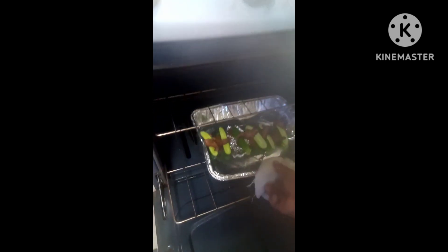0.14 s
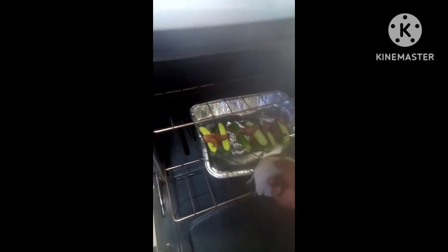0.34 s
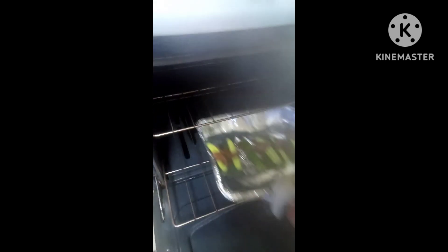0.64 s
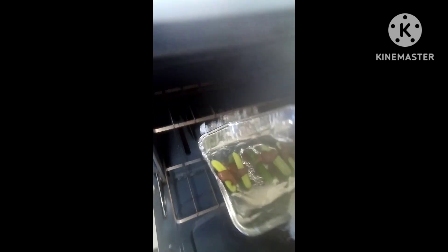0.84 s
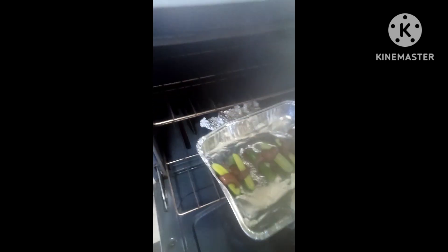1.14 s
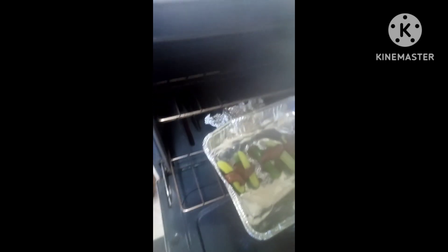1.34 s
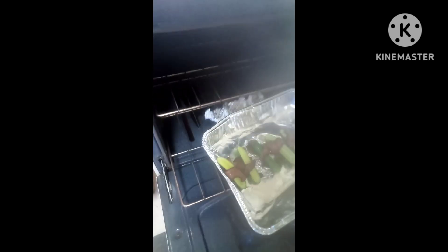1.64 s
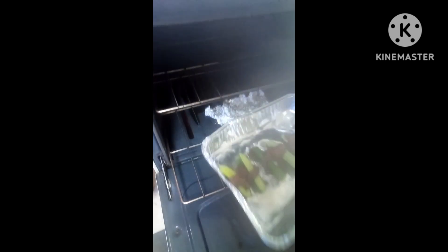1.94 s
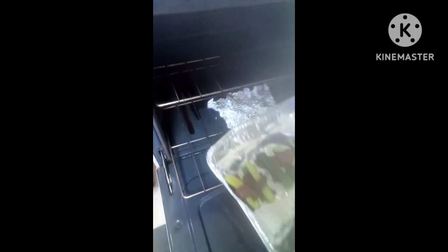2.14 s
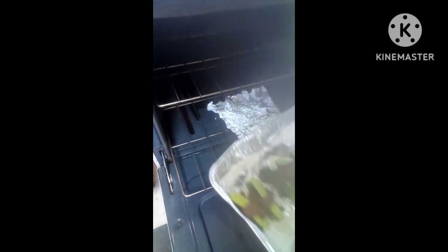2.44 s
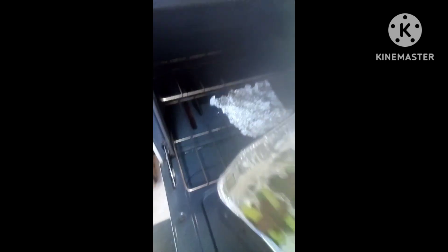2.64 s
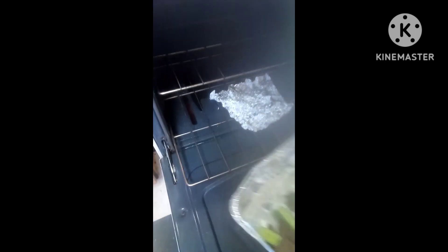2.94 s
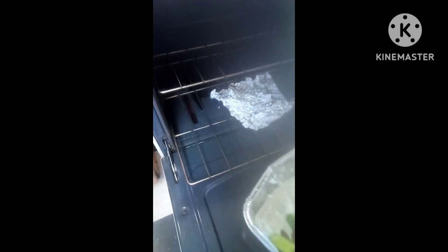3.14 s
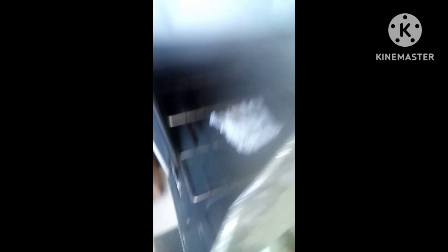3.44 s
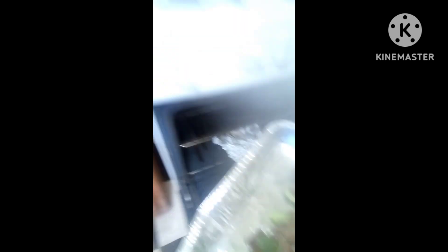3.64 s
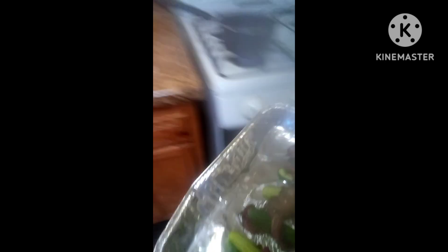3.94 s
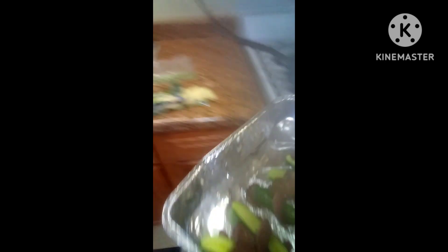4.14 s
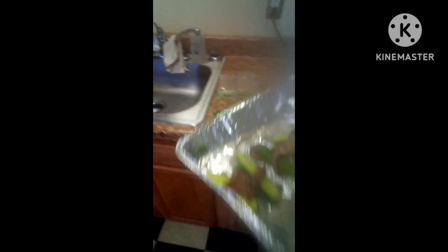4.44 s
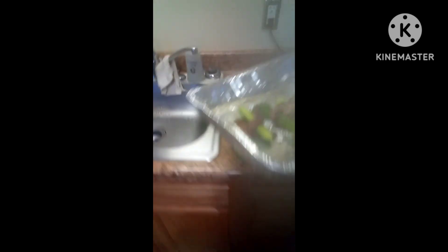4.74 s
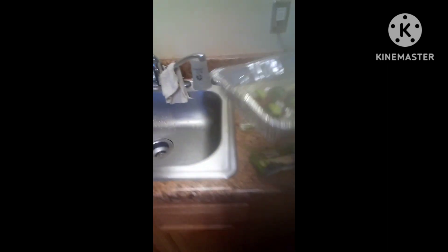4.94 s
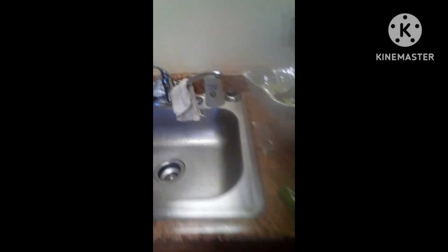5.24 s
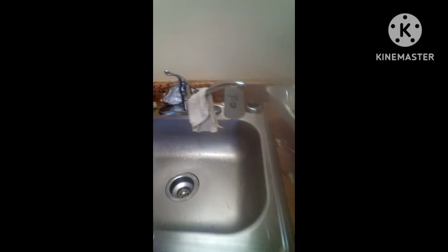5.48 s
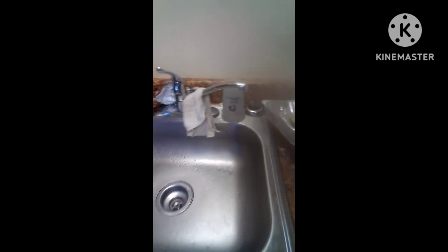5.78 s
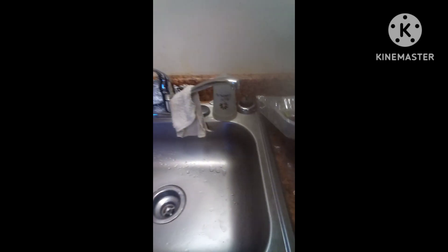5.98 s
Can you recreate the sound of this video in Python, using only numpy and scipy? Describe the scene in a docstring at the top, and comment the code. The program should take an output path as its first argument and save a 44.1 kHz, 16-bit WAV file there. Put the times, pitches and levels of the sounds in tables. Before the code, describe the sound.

In a home kitchen a loaded foil pan slides off a wire oven rack: faint scrapes, then loud crisp crackles, short squeaks and dull thumps with faint wire ringing. A pause, a denser second burst of buckling, then only a low fan and mains hum until the pan is set on the counter with one short tinny clack. Close handheld microphone, slightly overloaded.

```python
"""A kitchen with an open oven: a loaded foil pan is dragged off a wire rack and then set down on a counter.
The foil hisses from thousands of tiny slips; its buckles are noise bursts ringing a few panels.
Squeaks and thumps come with the slide; struck modes make the rack wires, the pan floor and the rim.
Sparse echoes answer from oven and kitchen. A fan blows as shaped noise over a mains hum."""
import sys
import numpy as np
from scipy import signal
from scipy.fft import rfft, irfft, next_fast_len
from scipy.io import wavfile
from scipy.ndimage import uniform_filter1d

SR = 44100
rng = np.random.default_rng(int(sys.argv[2]) if len(sys.argv) > 2 else 0)


def digitize_waveform(pressure):
    """Quantize a signal to 16-bit integers and store it at the path in sys.argv[1].

    Rows of a 2-D input are taken as channels; values are limited to [-1, 1].
    """
    field = np.atleast_2d(pressure).T
    bounded = np.clip(field, -1, 1)
    quanta = np.round(bounded * 32767).astype(np.int16)
    wavfile.write(sys.argv[1], SR, quanta)


def to_linear_factor(level_db):
    """Convert decibel levels (scalar or array-like) to linear amplitude factors."""
    exponent = np.asarray(level_db, float) / 20
    return 10 ** exponent


N = 269451

# Foil buckles. Each row: start in seconds, peak level in dB, main ring in Hz,
# low body in dB and treble in dB, both against the middle of the foil's spectrum.
BUCKLES = [(0.309, -40, 735, -18, 6), (0.433, -32, 466, -2.5, -11), (0.574, -21, 851, -14, -25),
           (0.674, -14, 1090, -1, -32), (0.716, -13.5, 813, -4, -13), (0.783, -21, 856, 0, -16),
           (0.849, -20.5, 985, -8, -30), (0.897, -10, 2950, -3, -14), (1.004, -6, 3260, -6.5, -1.5),
           (1.032, -6.5, 686, -12, -8), (1.278, -7.5, 4910, -9, -5.5), (1.306, -8.5, 2200, -20.5, -26),
           (1.333, -15, 3210, -6, -21), (1.478, -20, 681, 7.5, -51), (1.512, -18.5, 821, -14, -23),
           (1.549, -30, 818, -25, -24), (1.671, -29, 684, -38, -14), (1.87, -25, 482, 0, -18),
           (1.917, -6.5, 1630, -8, -16), (1.943, -11, 3350, -30, -9.5), (2.094, -26, 692, -19, -8),
           (2.154, -23, 678, -16, -25), (2.175, -15, 3050, 3, -25), (2.193, -10, 816, -10.5, -29),
           (2.231, -6, 1290, -10.5, -26), (2.263, -14.5, 939, -10, -18), (2.307, -6.5, 3040, -13, -5),
           (2.37, -6.5, 953, -9, -12.5), (2.4, -12, 694, -9.5, -15), (2.48, -18, 689, 0, -15),
           (2.524, -8, 880, -15.5, -17), (2.553, -9.5, 692, -7, -18), (2.599, -13.5, 991, 2, -36.5),
           (2.619, -10, 972, -14, -23), (2.66, -19.5, 961, -3.5, -37), (2.739, -11, 1240, 0, -35),
           (2.765, -19, 786, -1, -48), (2.847, -18, 1120, -11.5, -40), (2.859, -11.5, 1310, -4.5, -38),
           (3.016, -31.5, 579, -26, -19), (3.152, -45, 460, -7.5, -23), (3.197, -38, 703, -10, -21),
           (3.359, -39.5, 705, -7, -33), (5.63, -45.5, 3000, -12, -9), (5.842, -10, 2400, -7, -26)]
ON_COUNTER_S = 5  # buckles from here on happen on the counter
# Buckles with less treble than this are blunt; the share is dB lost per dB of missing treble.
DULL_BELOW_DB, DULL_SHARE = -24, .55


def evened(x):
    """Scales to rms 1."""
    return x / np.sqrt(np.mean(x ** 2) + 1e-20)


def read(points, hz):
    """Reads a spectrum on a log axis, flat beyond its ends."""
    f, value = np.transpose(points)
    return np.interp(np.log(hz + 1), np.log(f + 1), value)


def curve(points):
    """Draws a breakpoint table as automation, one value per sample."""
    s, value = np.transpose(points)
    return np.interp(np.arange(N) / SR, s, value)


def coloured(x, gain):
    """Filters x by gain(hz), at rms 1."""
    size = next_fast_len(len(x), True)
    spectrum = rfft(x, size) * gain(np.fft.rfftfreq(size, 1 / SR))
    return evened(irfft(spectrum, size)[:len(x)])


def peak(hz, centre_hz, width_hz):
    """Resonance curve of top 1."""
    return 1 / np.sqrt(1 + (2 * (hz - centre_hz) / width_hz) ** 2)


def struck(modes, factor=1):
    """A struck body: dying modes with a soft onset, each with a random start phase."""
    t = np.arange(SR // 4) / SR
    ring = sum(to_linear_factor(db - 60 * t / t60) * np.sin(2 * np.pi * (factor * hz * t + 0.29 * rng.random()))
               for hz, db, t60 in modes)
    return ring * (1 - np.exp(-(t / .0006) ** 2))


def hum():
    """Mains hum: one sine whose level wavers a little."""
    # Each row: time in seconds, level in dB around which the hum wavers.
    hum_level = [(0, -39), (1.8, -38.5), (2.3, -42), (2.8, -38.5), (3.9, -40.5), (4.5, -37), (5.5, -38),
                 (5.75, -43), (6.11, -43)]
    waver_db = 1.1 * coloured(rng.standard_normal(N), lambda hz: peak(hz, 0, 23) ** 2)
    tone = np.sqrt(2) * np.sin(2 * np.pi * 240 * np.arange(N) / SR)
    return to_linear_factor(curve(hum_level) + waver_db) * tone


def rumble():
    """Fan rumble gathered in room resonances: noise through narrow peaks."""
    # Each row: centre in Hz, width in Hz before the curve is squared, level in dB before the swell.
    resonances = [(57.5, 6, -53), (94.3, 15, -51.5), (117, 5, -59), (205.2, 88, -50), (269, 180, -53),
                  (2950, 260, -63)]
    # The deepest rumble grows near the walls. Each row: time in seconds, added level in dB.
    swell = [(0, -2.5), (1.1, -4), (2.5, -5.5), (4.3, -2.5), (5, -0.5), (6.11, 2.5)]
    swell_db = curve(swell)
    out = np.zeros(N)
    for centre_hz, width_hz, db in resonances:
        band = coloured(rng.standard_normal(N), lambda hz: peak(hz, centre_hz, width_hz) ** 2)
        out += to_linear_factor(db + swell_db * (centre_hz < 140)) * band
    return out


def air_rush():
    """Fan air: shaped noise with patches of the spectrum that swell and fade."""
    # Each row: frequency in Hz, density in dB per Hz before levelling.
    rush_spectrum = [(180, -13), (300, -5.5), (419, -3.5), (454, -4.5), (595, -8), (831, -6.5),
                     (991, -11.5), (1520, -12.5), (2090, -18.5), (2970, -22.5), (5450, -33), (7860, -55.5),
                     (13500, -65)]
    frames, hz = N // 256 + 5, np.fft.rfftfreq(1024, 1 / SR)
    real, imaginary, patches = rng.standard_normal((frames, 513, 3)).T
    # smoothed over 12 bins and 14 frames
    patches = evened(uniform_filter1d(uniform_filter1d(patches, 12, 0), 14, 1))
    # the last row is left out, so the top stays flat
    z = (real + 1j * imaginary) * to_linear_factor(read(rush_spectrum[:-1], hz)[:, None] + 1.6 * patches)
    rush = signal.istft(z, nperseg=1024, noverlap=768)[1][:N]
    return to_linear_factor(-46) * evened(rush)


def fan():
    """The steady bed: air rush, rumble and hum."""
    return air_rush() + rumble() + hum()


def room(x, decay, first_s):
    """Sparse reflections of random sign, each band dying at its own speed."""
    taps = np.zeros(SR)
    at = np.arange(round(first_s * SR), SR - 20, 20)
    taps[at + rng.integers(0, 20, len(at))] = rng.choice([-1., 1.], len(at))
    hz, t, z = signal.stft(taps, SR, nperseg=256)
    fade = to_linear_factor(-60 * t / read(decay, hz)[:, None])
    tail = signal.istft(z * fade, SR, nperseg=256)[1]
    return signal.fftconvolve(x, tail / np.linalg.norm(tail))[:N]


def kitchen(x):
    """The kitchen answers what happens on the counter."""
    # Each row: frequency in Hz, t60 in seconds.
    kitchen_decay = [(600, 0.59), (1200, 0.48), (2800, 0.51), (5000, .55), (8000, 0.29), (12000, 0.25)]
    return to_linear_factor(-4.0) * room(x, kitchen_decay, 0.0036)


def oven(strikes, slide):
    """The oven box answers the strikes and the slide."""
    # Each row: frequency in Hz, t60 in seconds.
    oven_decay = [(400, 0.19), (1000, 0.18), (2800, 0.75), (7000, 0.35), (14000, 0.41)]
    return room(to_linear_factor(-10) * strikes + to_linear_factor(-10.5) * slide, oven_decay, .004)


def rack_thud():
    """The rack settles when the weight leaves: low noise that rises, holds and dies."""
    noise = coloured(rng.standard_normal(N), lambda hz: peak(hz, 125, 120) ** 2)
    start_s, rise_s, hold_s, t60_s = 2.845, .015, .12, .15
    age = np.arange(N) / SR - start_s
    fall_db = 60 * np.maximum(age - hold_s, 0) / t60_s
    return noise * np.clip(age / rise_s, 0, 1) * to_linear_factor(-40 - fall_db)


def rack(shaking):
    """The wires ring on after whatever shakes them, as a bank of dying sines."""
    # Each row: frequency in Hz, relative level in dB, t60 in seconds.
    wires = [(579, -25.5, 0.53), (680, -28.5, .45), (694, -22, 0.55), (847, -23, 0.21), (985, -24, 0.15),
             (1230, -26.5, 0.39), (1644, -25, .3), (2260, -54, 0.16), (2696, -33.5, .2)]
    t = np.arange(SR) / SR
    ring = sum(to_linear_factor(db - 60 * t / t60) * np.sin(2 * np.pi * hz * t) for hz, db, t60 in wires)
    return to_linear_factor(-32.5) * signal.fftconvolve(shaking, ring)[:N] + rack_thud()


def rim():
    """The pan's rim rings against the counter with the last buckle."""
    # Each row: frequency in Hz, level in dB, t60 in seconds.
    rim_modes = [(864, -24.5, 0.048), (1212, -18.5, 0.034), (1583, -26, 0.034), (2280, -23, .025),
                 (2820, -22, 0.044), (3800, -24, 0.029), (4690, -34, .02)]
    out, ring = np.zeros(N), struck(rim_modes)
    out[round(BUCKLES[-1][0] * SR):][:len(ring)] += ring
    return out


def knocks():
    """The food's weight thumps the damped pan floor onto a wire, and once more as it bounces."""
    # Each row: start in seconds, peak level in dB, pitch factor.
    thumps = [(.573, -21, 1.18), (.674, -17, 0.92), (.783, -22, 1.3), (1.261, -29.5, 0.92),
              (1.477, -20, 0.94), (1.7, -31, 1.38), (1.87, -22.5, 0.68), (2.48, -21.5, 1.04),
              (2.661, -17.5, 1.4), (2.74, -19.5, 1.3), (2.765, -18.5, 0.96), (2.845, -22, 0.76)]
    # Loaded pan floor. Each row: frequency in Hz before the pitch factor, relative level in dB, t60 in seconds.
    floor_modes = [(173.5, -7.5, 0.035), (330, 0.5, 0.016), (693, 0.5, 0.051), (1156, -2, 0.044),
                   (1407, -10.5, .035), (1655, -7.5, .03)]
    out = np.zeros(N)
    for s, db, factor in thumps:
        ring = struck(floor_modes, factor)
        ring[220:] += 0.56 * struck(floor_modes, factor)[:-220]  # bounce 5 ms later
        out[round(s * SR):][:len(ring)] += to_linear_factor(db) * ring / abs(ring).max()
    return out


def foil(hz):
    """The foil's gain split in low body, middle and treble, each of power 1."""
    # Each row: frequency in Hz, density in dB per Hz before levelling.
    sheet_spectrum = [(150, -36), (300, -14.5), (450, -6.5), (700, -1), (960, 2), (1800, -1.5), (3800, -2),
                      (6400, -5), (7300, -10), (8500, -19), (10000, -19.5), (13400, -25.5)]
    low, high = 1 / (1 + (hz / 1400) ** 4), 1 - 1 / (1 + (hz / 6000) ** 6)
    sheet = to_linear_factor(read(sheet_spectrum, hz))
    return [evened(sheet * share) for share in (low, 1 - low - high, high)]


def dullness(treble_db):
    """How many dB of treble a buckle lacks to be crisp."""
    return max(DULL_BELOW_DB - treble_db, 0)


def shiver():
    """Envelope of the sheet's shaking after the buckles on the rack; blunt ones shake it less."""
    kicks, t60_s = np.zeros(N), .35
    for s, db, *_, treble_db in BUCKLES:
        kick_db = db - DULL_SHARE * dullness(treble_db)
        kicks[round(s * SR)] = to_linear_factor(2 * kick_db) * (s < ON_COUNTER_S)
    # the energies add up and leak away
    return np.sqrt(signal.lfilter([1], [1, -to_linear_factor(-2 * 60 / (t60_s * SR))], kicks))


def bending(x):
    """The sheet's resonances shift as it flexes: patches of some 430 Hz by 40 ms swell and fade."""
    z = signal.stft(x, nperseg=512, noverlap=384)[2]
    patches = rng.standard_normal(z.T.shape)
    patches = uniform_filter1d(uniform_filter1d(patches, 14, 0), 5, 1).T
    return signal.istft(z * to_linear_factor(2.5 * evened(patches)), nperseg=512, noverlap=384)[1][:N]


def crinkles():
    """Sparse creases, each a few cycles of one small facet of the foil."""
    per_s, facets = 260, 24
    out, t = np.zeros(N), np.arange(400) / SR
    for hz, cycles in zip(np.geomspace(700, 6500, facets), rng.uniform(4, 9, facets)):
        size = to_linear_factor(4.6 * np.minimum(rng.exponential(1, N), 4))
        creases = size * (rng.random(N) < per_s / facets / SR)
        facet = np.exp(-t * hz / cycles) * np.sin(2 * np.pi * hz * t)
        out += signal.oaconvolve(creases, facet)[:N]
    return evened(out)


def squeaks(slips):
    """A wire sings for a moment under the sliding pan: the slips through one narrow resonance."""
    # Each row: start in seconds, end in seconds, frequency in Hz, level in dB.
    strokes = [(.17, 0.236, 950, -53), (.19, 0.21, 3870, -50.5), (.58, 0.624, 5160, -39),
               (.68, 0.713, 1280, -34.5), (.745, 0.774, 5800, -42), (.8, 0.856, 980, -38),
               (.82, 0.94, 2900, -40.5), (1.545, 1.558, 4090, -50)]
    out, t = np.zeros(N), np.arange(N) / SR
    for start, end, wire_hz, db in strokes:
        stroke = np.clip(np.minimum(t - start, end - t) / .008, 0, 1)
        out += to_linear_factor(db) * stroke * coloured(slips, lambda hz: peak(hz, wire_hz, 220) ** 2)
    return out


def drag():
    """Tiny slips of uneven size, in clumps, shake the foil while it slides."""
    # The pan dragged over the wires. Each row: time in seconds, level of the treble hiss in dB.
    slide_level = [(0, -66), (0.06, -90), (0.15, -58), (0.2, -50), (0.25, -58), (0.29, -74), (0.32, -62),
                   (0.36, -84), (0.42, -84), (0.45, -47), (0.57, -47), (0.62, -42), (0.9, -44), (1.0, -52),
                   (1.08, -54), (1.19, -71), (1.23, -57), (1.27, -72), (1.45, -83), (1.52, -74), (1.6, -90),
                   (1.65, -88), (1.69, -60), (1.73, -88), (1.8, -60), (1.84, -56), (1.87, -72), (2.08, -48),
                   (2.14, -51), (2.28, -46), (2.43, -56), (2.62, -56), (2.76, -66), (2.82, -76),
                   (2.92, -57), (3.02, -60), (3.08, -85), (3.17, -76), (3.3, -94)]
    treble_db, shaking = curve(slide_level), shiver()
    over_db = treble_db + 45  # treble above its reference of -45 dB
    # middle and low body follow the treble in part; the shiver adds to each by power
    mid_gain = np.hypot(to_linear_factor(-35.5 + .6 * over_db), to_linear_factor(-25) * shaking)
    low_gain = np.hypot(to_linear_factor(-41.5 + .33 * over_db), to_linear_factor(-27) * shaking)
    # about 7000 slips a second
    size = to_linear_factor(1.12 * np.minimum(rng.exponential(1, N), 4)) * (rng.random(N) < 7000 / SR)
    clumps = to_linear_factor(1.27 * evened(uniform_filter1d(rng.standard_normal(N), 500)))
    slips = bending(size * clumps * rng.standard_normal(N))
    low, mid, high = (coloured(slips, lambda hz: foil(hz)[k]) for k in range(3))
    hiss = mid_gain * (mid + 0.45 * crinkles()) + low_gain * low + to_linear_factor(treble_db) * high
    fade_out = np.clip((slide_level[-1][0] - np.arange(N) / SR) / 0.17, 0, 1)
    return (hiss + squeaks(slips)) * fade_out


def pops(rows):
    """Each buckle is a snap and a short rattle that ring a few panels of the foil."""
    out, t = np.zeros(N + 4096), np.arange(4096) / SR
    hz = np.fft.rfftfreq(4096, 1 / SR)
    low, mid, high = foil(hz)
    upper = np.clip(np.log2(hz / 2500 + 1e-9), 0, 1)  # where blunt buckles are darker
    noise, panels = rng.standard_normal((len(rows), 2, 4096)), rng.random((len(rows), 6))
    for (s, db, ring_hz, low_db, treble_db), (grain, flutter), panel in zip(rows, noise, panels):
        dull_db = dullness(treble_db)
        rings = 1.5 * peak(hz, ring_hz, .15 * ring_hz)
        rings += sum(.7 * peak(hz, f, .08 * f) for f in 500 * 12 ** panel)  # 500 to 6000 Hz
        body = mid * to_linear_factor(-DULL_SHARE * dull_db * upper) + to_linear_factor(low_db) * low + to_linear_factor(treble_db) * high
        uneven = grain * to_linear_factor(2.7 * evened(uniform_filter1d(flutter, 40)))
        rattle = evened(irfft(rfft(uneven) * body * (1 + rings)))
        rise_s = 0.00011 + .00003 * dull_db  # blunt buckles start slower
        t60_s = .034 - .0007 * db  # a hard buckle dies fast, a softer one lasts longer
        rise = 1 - np.exp(-t / rise_s)
        fall = to_linear_factor(-60 * (t / t60_s) ** 1.325)  # holds for some ms, then dies quickly
        snap = 1 + 0.47 * np.exp(-t / 0.00062)
        burst = rattle * rise * fall * snap
        out[round(s * SR):][:4096] += to_linear_factor(db) * burst / abs(burst).max()
    return out[:N]


def scene():
    """Pan on the rack inside the oven, pan on the counter in the kitchen, and the fan."""
    buckles = pops([row for row in BUCKLES if row[0] < ON_COUNTER_S])
    thumps, slide = knocks(), drag()
    counter = pops([row for row in BUCKLES if row[0] >= ON_COUNTER_S]) + rim()
    in_oven = buckles + thumps + slide + rack(buckles + slide) + oven(buckles + thumps, slide)
    in_kitchen = counter + kitchen(counter)
    return (in_oven + in_kitchen + fan())[None]


def top_cut(x):
    """Nothing passes above the cut-off."""
    return signal.sosfilt(signal.butter(12, 16820, fs=SR, output="sos"), x)


def record(dry):
    """Microphone with a bass cut and a port resonance, then soft overload."""
    # Each row: frequency in Hz, gain in dB.
    mic_response = [(30, -5.5), (55, 3), (13700, -1.5), (14300, 6), (14800, 9.5), (15400, 9.5), (15750, -8),
                    (16800, -38)]
    heard = irfft(rfft(dry) * to_linear_factor(read(mic_response, np.fft.rfftfreq(N, 1 / SR))), N)
    mix = 0.57 * np.tanh(heard / 0.62)
    return top_cut(mix)


dry = scene()
out = record(dry)
digitize_waveform(out)
```